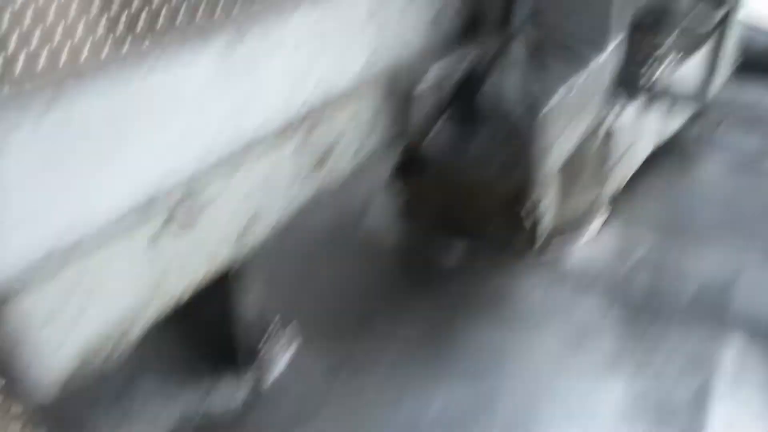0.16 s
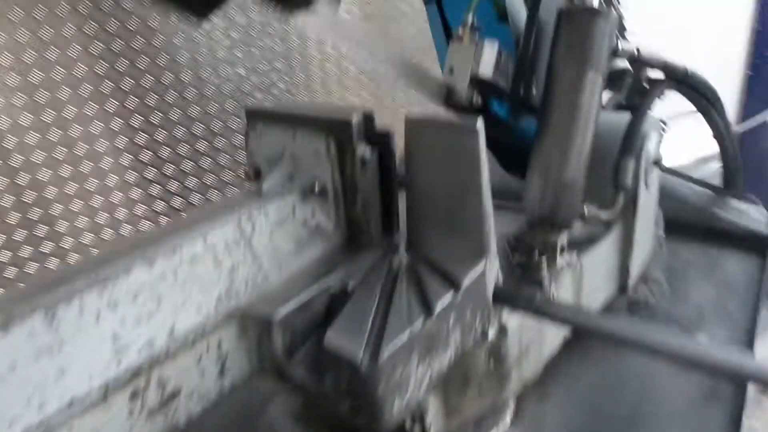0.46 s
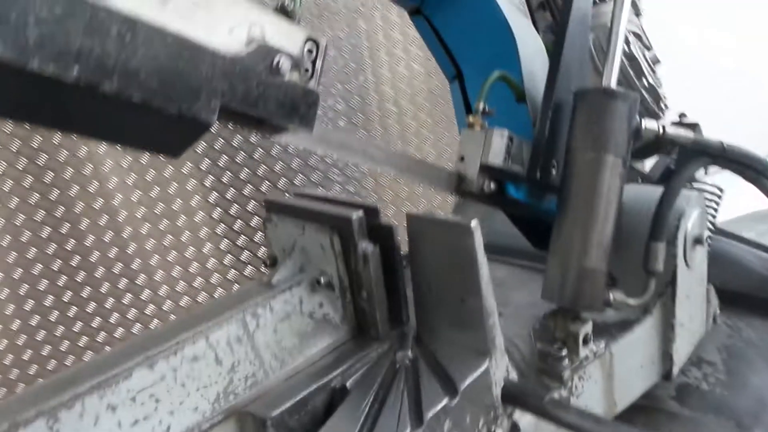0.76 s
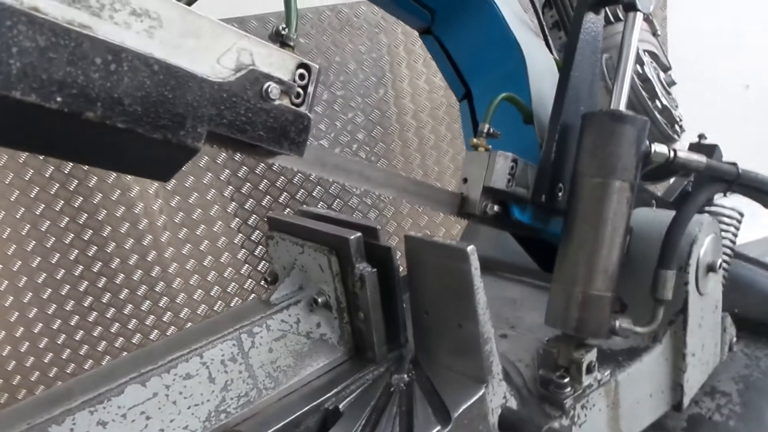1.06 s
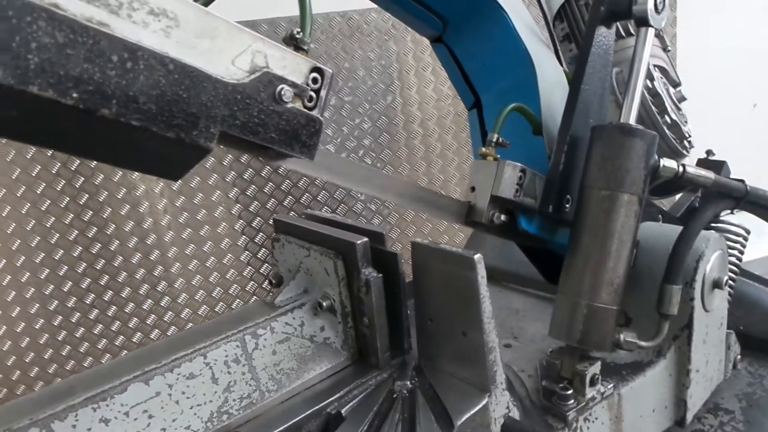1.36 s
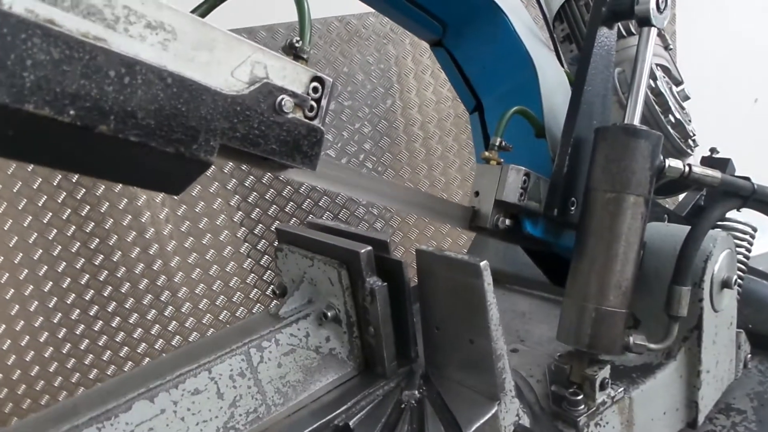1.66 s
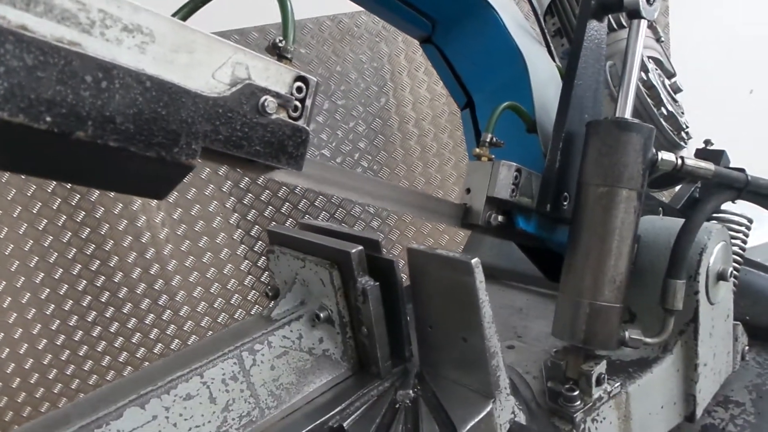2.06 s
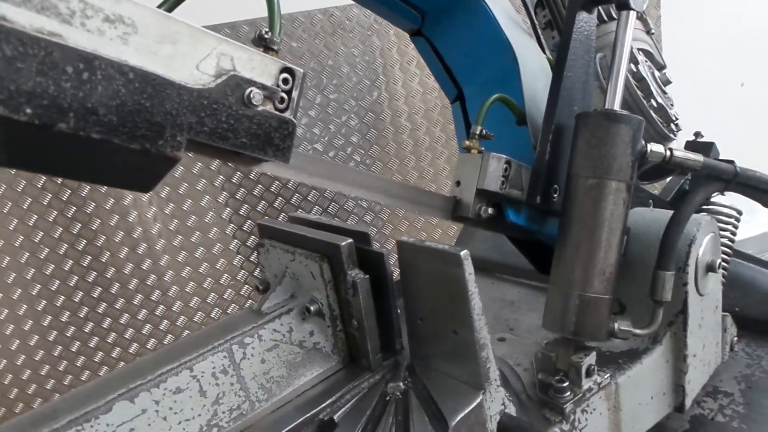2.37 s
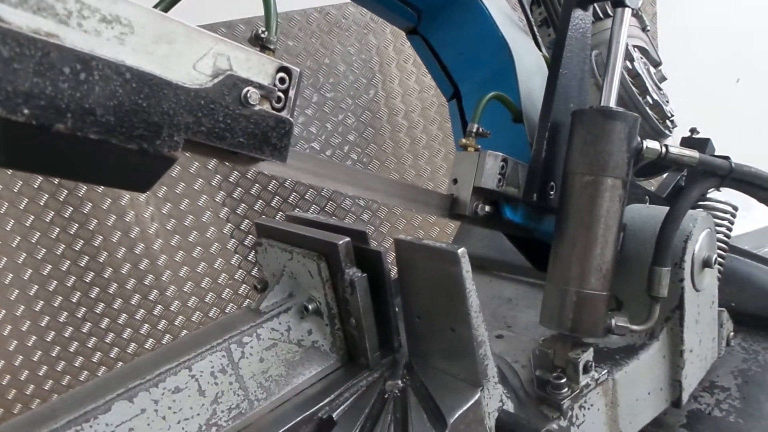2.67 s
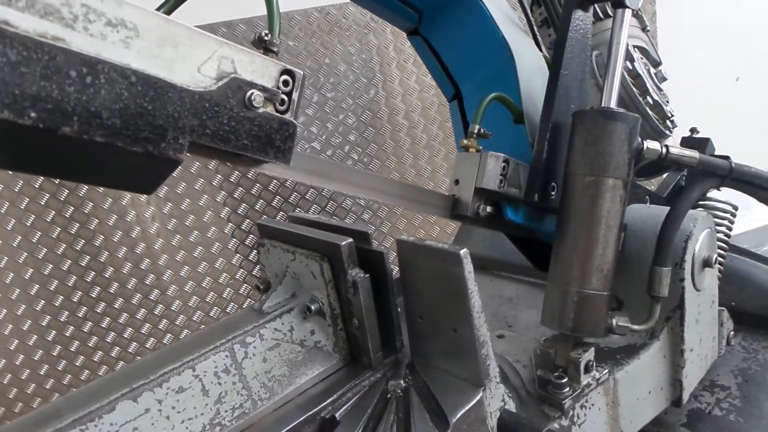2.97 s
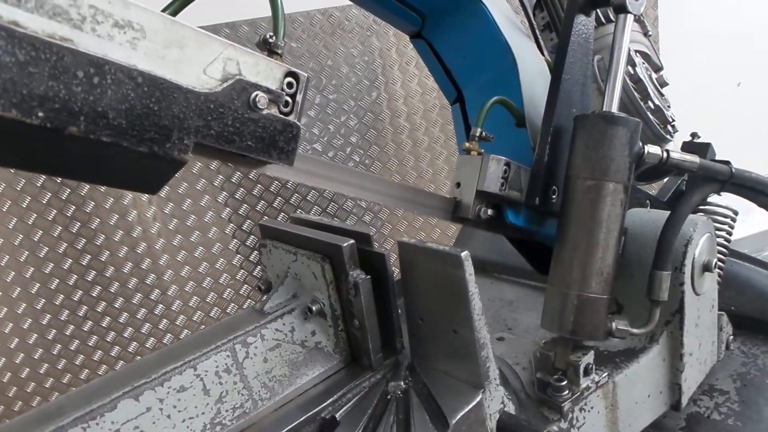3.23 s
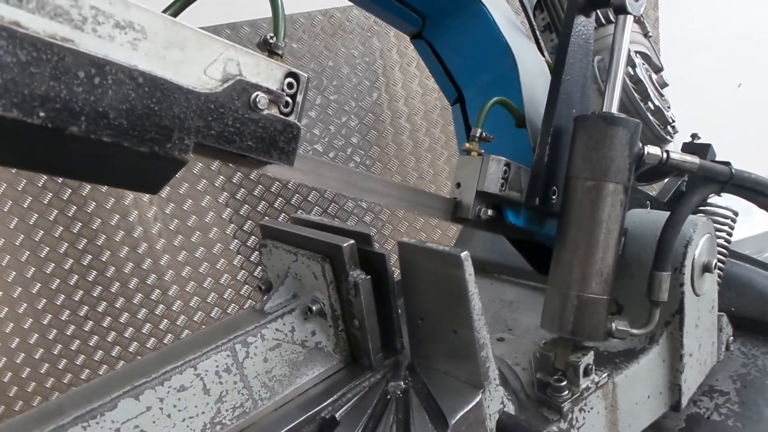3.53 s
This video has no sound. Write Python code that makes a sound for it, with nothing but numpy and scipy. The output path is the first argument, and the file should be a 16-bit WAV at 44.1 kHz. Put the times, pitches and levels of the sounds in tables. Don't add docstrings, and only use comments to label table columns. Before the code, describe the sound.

Metal-cutting band saw clunks into life after a few switch knocks, then whines steadily and high

```python
import sys
import numpy as np
from scipy import signal
from scipy.fft import rfft, irfft
from scipy.io import wavfile
from scipy.ndimage import uniform_filter1d

SR = 44100
rng = np.random.default_rng(int(sys.argv[2]) if len(sys.argv) > 2 else 0)


def unload_wav(signal):
    wavfile.write(
        sys.argv[1],
        SR,
        np.round(np.clip(np.atleast_2d(signal).T, -1, 1) * 32767).astype(np.int16),
    )


def magnitude_from_level(level_db):
    exponent = np.asarray(level_db, float) / 20
    return 10 ** exponent


N = 163170
M = 2 ** 18
F = np.arange(M // 2 + 1) * SR / M + 1e-3
T = np.arange(N) / SR

# frequency in Hz, level in dB per Hz.
SHOP_COLOUR = [(30, -19), (100, -6), (250, -2.5), (600, -11.5), (1700, -11.5), (4750, -20.5), (6300, -31),
               (16000, -35.5)]
# frequency in Hz, width in Hz, level in dB.
SHOP_RINGS = [(219, 3.1, 0.94), (290, 26, 4.3), (435.5, 28, 2.8), (559, 9.3, 5.7), (700, 39, 0.65),
              (820, 65, 0.7)]
# time in seconds, level in dB.
SHOP_LEVEL = [(0, -45), (.28, -40), (.45, -39.5), (.85, -39), (1.2, -41), (3.7, -42.5)]
# frequency in Hz, level in dB rms.
FAN_TONES = [(111, -54.5), (200, -50.5), (220, -49)]
# start in seconds, boom in dB, tick in dB.
KNOCKS = [(.310, -35, -28), (0.316, -18.5, -35), (0.332, -24.5, -33.5), (.347, -26, -32), (.355, -28, -36),
          (0.531, -33, -38), (.589, -23.5, -40), (0.603, -23.5, -53), (0.617, -24, -46), (.699, -26, -32.5),
          (0.7026, -33, -37), (.706, -31.5, -35.5), (0.727, -30, -49)]
# frequency in Hz, width in Hz, level in dB.
BOX_MODES = [(292, 40, 0), (390, 70, -12), (620, 150, -11), (830, 200, -9), (1100, 250, -9)]
# frequency in Hz, level in dB per Hz.
TICK_COLOUR = [(300, 8), (1500, 2.5), (4000, -3), (6000, -4.5), (8500, -22), (16000, -24)]
# start in seconds, level in dB, length in seconds.
BRUSHES = [
    (0.316, -41, 0.057),
    (0.505, -49, 0.044),
    (0.534, -45, 0.022),
    (.58, -47, 0.058),
    (0.64, -49, 0.03),
    (0.71, -44, 0.022),
]
# start in seconds, frequency in Hz, level in
# dB, length in seconds.
SWITCH_PINGS = [(.3098, 3900, -27.5, .002), (.3102, 1100, -29, .006), (.314, 5800, -58, 0.0025),
                (.3205, 4500, -32, .003), (.322, 800, -33, 0.015), (.3465, 4000, -26, .002),
                (.354, 4600, -31, .003), (.48, 7700, -64, .04), (.512, 5850, -55, .012),
                (.527, 5850, -50, .01), (.527, 8800, -62, .01), (.532, 7700, -60, .006),
                (.589, 6400, -52, 0.0087), (.61, 6500, -58, .03), (.657, 5450, -53, .03),
                (.659, 6450, -52, .015), (.700, 9700, -43, 0.0066), (.700, 7800, -45, .006),
                (.702, 6000, -40, 0.011), (.702, 5400, -42, 0.011), (.716, 3500, -40, 0.0068),
                (.717, 5850, -54, 0.044), (.74, 285, -48.5, 0.31), (.84, 437, -51, 0.17)]
# start in seconds, level in dB, length in seconds.
BLOWS = [(1.236, -28.5, 0.044), (1.253, -17, 0.022), (1.266, -14.5, 0.02), (1.289, -19.5, 0.026),
         (1.342, -25.5, 0.017), (1.375, -25.5, 0.057), (1.421, -24, 0.012), (1.431, -18, 0.025),
         (1.579, -19.5, 0.0094), (1.605, -22, 0.012), (2.975, -26, 0.02), (3.24, -29, 0.011),
         (3.521, -27.5, 0.015)]
# frequency in Hz, level in dB per Hz.
BLOW_COLOUR = [(24, -37), (90, -8.5), (276, -3.5), (354, -3.5), (770, -12), (1440, -16.5), (2000, -10.5),
               (4030, -12.5), (16000, -37)]
# frequency in Hz, width in Hz, level in dB.
FRAME_MODES = [(313, 7.4, -25), (420, 7.4, -5), (620, 92, -10), (726, 48, -1), (980, 194, -2),
               (2480, 360, -20)]
# start in seconds, frequency in Hz, level in dB, length in seconds.
FRAME_CLANGS = [(1.263, 730, -26, 0.01), (1.269, 2130, -17, 0.0067), (1.269, 4050, -24, .006),
                (1.272, 2940, -32, .005), (1.268, 5000, -18, 0.0068), (1.275, 557, -18, 0.0095),
                (1.287, 785, -25, 0.0072), (1.335, 630, -29, .008), (1.372, 2270, -22, 0.0028),
                (1.428, 3800, -21, .01), (1.441, 770, -33, 0.011), (1.444, 1040, -19.5, 0.031),
                (1.573, 700, -41, 0.01)]
# frequency in Hz, level in dB rms.
MOTOR_TONES = [(100, -51), (200, -61.5), (346, -51.5), (543, -50), (597, -54), (642.5, -45), (699.6, -77),
               (742.5, -44), (869.5, -56), (938, -51.5), (1070, -50.5), (1304, -50.5), (1358, -51.5),
               (3177, -40.5)]
# time in seconds, level in dB.
WHINE_LEVEL = [(1.28, -35), (1.315, -28), (1.33, -26.5), (1.87, -26.5), (2.01, -28.5), (2.18, -27),
               (3.18, -26.5), (3.3, -24), (3.34, -28), (3.7, -27.5)]
GUIDE_HZ = [2225, 2650, 3190, 3750, 4228, 4465, 4683, 4740, 4803, 5005, 5225, 5380, 5985]
# width in Hz, level in dB.
GUIDE_SHAPES = [(51, -9.5), (30.3, -10), (40, -14.5), (47, -9.5), (93, -9), (55.6, -5), (45, 3.5),
                (39.8, 5), (44, 1.5), (67, -3), (55.556, -12.5), (64.8, -12), (43.2, -19.5)]
# frequency in Hz, width in Hz, level in dB.
GEAR_MODES = [(228, 240, -26), (308, 160, -4.5), (423, 120, -6), (602, 27, 0.5), (724, 38, 2),
              (973, 15, -1.5), (1048, 6.5, 3.5), (1270, 55, -3), (1690, 12, -4)]
# frequency in Hz, level in dB per Hz.
BED_COLOUR = [(60, -11), (200, -24), (500, -20.5), (1000, -14.5), (1700, -15), (3500, -13.5), (6400, -17),
              (16000, -38)]
# time in seconds, level in dB.
SCRAPE_LEVEL = [(1.28, -37.5), (1.73, -29), (1.75, -35), (1.77, -30.5), (1.95, -39), (2.15, -39.5),
                (2.18, -30.5), (2.22, -40.5), (2.28, -29.5), (2.3, -44), (2.69, -35), (2.96, -46),
                (3.0, -32.5), (3.08, -42), (3.38, -41.5), (3.53, -30.5), (3.56, -39.5), (3.7, -45)]
SHEEN_HZ = [6820, 7610, 8270, 8790, 9570, 10050, 10670, 11420, 11650, 12300, 13310, 14355, 15300]
# width in Hz, level in dB.
SHEEN_SHAPES = [(86, 8.5), (109, 5), (50, 3), (35, -1), (120, 2.5), (90.5, 0), (110, 4), (97.2, 1),
                (130, -5), (180, -3.5), (100, 3.5), (80, -10), (400, -7)]
# frequency in Hz, width in Hz, level in dB.
FLARE_MODES = [(5080, 30, -6), (5250, 58, 5.5), (5930, 50, 1)]
# frequency in Hz, width in Hz, level in dB.
SINGING_MODES = [(8900, 30, 0), (14355, 60, 0)]
# frequency in Hz, left minus right in dB.
PAN = [(60, 0.5), (110, 1.0), (200, 1.5), (380, 1.0), (700, 0.8), (1290, -2.0), (2380, -4.0), (4400, -10.5),
       (8120, 3.5), (11500, -5), (15000, -8.0)]
# frequency in Hz, likeness from 0 to 1.
LIKENESS = [(60, .96), (250, .92), (600, .9), (1200, .55), (2500, .33), (4700, .68), (8000, .42),
            (16000, .42)]
# frequency in Hz, time to fall 60 dB in seconds.
ROOM_T60 = [(60, 0.49), (300, 0.73), (1000, 0.62), (4000, 2.1), (16000, 0.21)]
# frequency in Hz, width in Hz.
NOTCHES = [(6320, 90), (9230, 110), (13680, 200)]
NOTCH_DEPTHS = [.6, .9, .5]

LAG_S = 0.0003433
START_S, RISE_S = 1.255, 0.041


def along_f(table):
    hz, value = np.array(table, float).T
    return np.interp(np.log(F), np.log(hz), value)


def along_t(table):
    seconds, value = np.array(table, float).T
    return np.interp(T, seconds, value)


def through(x, gain):
    return irfft(rfft(x, M) * gain, M)[..., :N]


def rings(table):
    total = 0
    for k, (hz, width, db) in enumerate(table):
        damping = 1j * F * width
        total = total + (-1) ** k * magnitude_from_level(db) * damping / (hz * hz - F * F + damping)
    return total


def modes(frequencies, shapes):
    return [(hz, width, db) for hz, (width, db) in zip(frequencies, shapes)]


def unit(x):
    return x / np.sqrt(np.mean(x ** 2))


def walk(rate):
    k = int(SR / rate)
    steps = np.repeat(rng.standard_normal(N // k + 4), k)
    smooth = uniform_filter1d(uniform_filter1d(steps, k), k)
    return 1.213 * smooth[k:k + N]


def at_phone(gate, gain, panned=True):
    shared, left, right = (rfft(gate * rng.standard_normal(N), M) for _ in range(3))
    alike = along_f(LIKENESS)
    pan = magnitude_from_level(along_f(PAN) / 2)
    if not panned:
        alike = alike / (1 + (F / 2500) ** 2)
        pan = 1 + 0 * F
    late = np.exp(-2j * np.pi * F * LAG_S * np.clip((F / 1500) ** 2, 0, 1))
    pair = np.sqrt(alike) * shared + np.sqrt(1 - alike) * np.array([left, right])
    return irfft(pair * np.array([pan, late / pan]) * gain, M)[:, :N]


def bursts(times, dbs, lengths, rise):
    total = 0
    for start, db, length in zip(times, dbs, lengths):
        since = np.clip(T - start, 0, 1)
        total = total + magnitude_from_level(db) * (1 - np.exp(-since / rise)) * np.exp(-since / length)
    return total


def room(x):
    response, t = 0, T[:2 * SR]
    room_hz, room_s = np.array(ROOM_T60).T
    for hz in 62.5 * 2. ** np.arange(8):
        t60 = np.interp(np.log(hz), np.log(room_hz), room_s)
        noise = rng.standard_normal((3, len(t)))
        alike = np.clip(300 / hz, 0, .95)
        tail = np.sqrt(alike) * noise[0] + np.sqrt(1 - alike) * noise[1:]
        tail = tail * np.exp(-np.log(1000) * t / t60) * (1 - np.exp(-t / (0.0013 + 4 / hz)))
        tail = tail / np.sqrt(np.sum(tail ** 2) / 2)
        octave = np.exp(-np.log2(F / hz) ** 2 * 2)
        response = response + rfft(tail, M) * octave
    return through(x, response)


def shop():
    gain = magnitude_from_level(along_f(SHOP_COLOUR)) * (1 + np.abs(rings(SHOP_RINGS)))
    air = at_phone(magnitude_from_level(1.0 * walk(8.46)), gain, panned=False)
    return unit(air) * magnitude_from_level(along_t(SHOP_LEVEL))


def tones(table):
    total = 0
    for hz, db in table:
        level = np.sqrt(2) * magnitude_from_level(db + 1 * walk(8.1))
        phase = 2 * np.pi * np.cumsum(hz + 2.54 * walk(12)) / SR
        total = total + level * np.sin(phase + np.array([[0], [hz / 1200]]))
    return total


def pings(table, wobble_hz, pan_db):
    drift = 2 * np.pi * np.cumsum(wobble_hz * walk(150)) / SR
    total = 0
    for start, hz, db, length in table:
        lag = np.array([[0], [-2 * np.pi * hz * LAG_S]])
        loudness = bursts([start], [db + 6], [length], length / 5)
        total = total + loudness * np.sin(2 * np.pi * hz * (T - start) + drift + lag)
    return total * magnitude_from_level(np.array([[pan_db], [-pan_db]]) / 2)


def knocks():
    push_s, tick_s, wet_db = 0.0016, .0045, -7
    starts, booms, ticks = np.array(KNOCKS).T
    push = sum(magnitude_from_level(db) * np.exp(-((T - start - push_s) / (push_s / 3)) ** 2)
               for start, db in zip(starts, booms))
    box = 8 * through(push, rings(BOX_MODES))
    tick_gate = bursts(starts, ticks, tick_s + 0 * starts, 0.00016)
    brush_gate = bursts(*np.array(BRUSHES).T, 0.0055) * magnitude_from_level(4 * walk(199.7))
    plastic = 1.92 * at_phone(tick_gate + brush_gate, magnitude_from_level(along_f(TICK_COLOUR)), panned=False)
    return box + plastic + magnitude_from_level(wet_db) * room(box + plastic[0])


def blows():
    frame_db, wet_db, rise_s = 9, -2, .004
    gain = magnitude_from_level(along_f(BLOW_COLOUR)) * (1 + magnitude_from_level(frame_db) * np.abs(rings(FRAME_MODES)))
    gain = gain / np.sqrt(np.mean(gain ** 2))
    direct = at_phone(bursts(*np.array(BLOWS).T, rise_s), gain)
    return direct + magnitude_from_level(wet_db) * room(direct.mean(0))


def teeth_force():
    teeth_hz, depth, jitter, grit_db = 269.4, 0.36, 0.03946, 1
    turn = np.cumsum(teeth_hz * (1 + jitter * walk(60))) / SR
    return (1 + depth * np.cos(2 * np.pi * turn)) * magnitude_from_level(grit_db * walk(400))


def gearbox(surge):
    return unit(at_phone(magnitude_from_level(1.6 * walk(24.42)), rings(GEAR_MODES))) * magnitude_from_level(-40) * surge


def running_noise(surge):
    return unit(at_phone(magnitude_from_level(1.0 * walk(39.4)), magnitude_from_level(along_f(BED_COLOUR)))) * magnitude_from_level(-29.5) * surge


def guide_whine(teeth, since):
    whine = unit(at_phone(teeth * magnitude_from_level(1.05 * walk(40)), rings(modes(GUIDE_HZ, GUIDE_SHAPES))))
    return whine * magnitude_from_level(along_t(WHINE_LEVEL) + 4.5) * (1 - np.exp(-since / 0.014))


def blade_scrape(teeth, level):
    gain = np.abs(rings(modes(SHEEN_HZ, SHEEN_SHAPES))) + 0.12 * (F > 5500)
    hiss = unit(at_phone(teeth * magnitude_from_level(0.89 * walk(44.3)), gain))
    return hiss * magnitude_from_level(level + 3.0 + .5 * walk(25.3))


def guide_flares(level):
    return unit(at_phone(magnitude_from_level(level + 2 * walk(15)), rings(FLARE_MODES))) * magnitude_from_level(-35.5)


def blade_singing(since):
    return unit(at_phone(np.exp(-since / .9), rings(SINGING_MODES))) * magnitude_from_level(-51)


def saw():
    surge_db, settle_s = 3.5, 0.45
    since = np.clip(T - START_S, 0, None)
    on = 1 - np.exp(-since / RISE_S)
    surge = magnitude_from_level(surge_db * np.exp(-since / settle_s))
    teeth = teeth_force()
    scrape_db = uniform_filter1d(along_t(SCRAPE_LEVEL), size=1200)
    drive = tones(MOTOR_TONES) + gearbox(surge) + running_noise(surge)
    blade = guide_whine(teeth, since) + blade_scrape(teeth, scrape_db)
    return on * (drive + blade + guide_flares(scrape_db) + blade_singing(since))


def scene():
    background = shop() + tones(FAN_TONES)
    switch = knocks() + pings(SWITCH_PINGS, wobble_hz=21, pan_db=-4)
    frame = blows() + pings(FRAME_CLANGS, wobble_hz=29.8, pan_db=-2)
    return background + switch + frame + saw()


def top_cut(x):
    return signal.sosfilt(signal.butter(12, 16590, fs=SR, output="sos"), x)


def record(dry):
    low_cut_hz, top_hz = 89, 15750
    x = signal.sosfilt(signal.butter(3, low_cut_hz, "high", fs=SR, output="sos"), dry)
    gain = np.clip((top_hz - F) / 60 + 1, 0, 1) ** 2
    for (hz, width), depth in zip(NOTCHES, NOTCH_DEPTHS):
        gain = gain * (1 - depth * rings([(hz, width, 0)]))
    return top_cut(through(x, gain))


dry = scene()
out = record(dry)
unload_wav(out)
```